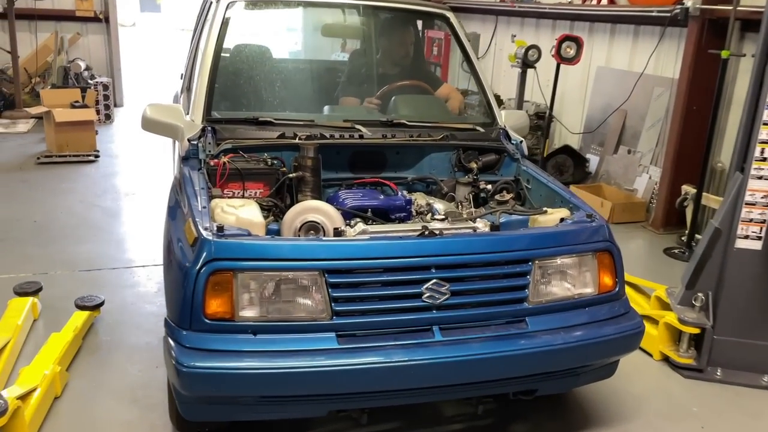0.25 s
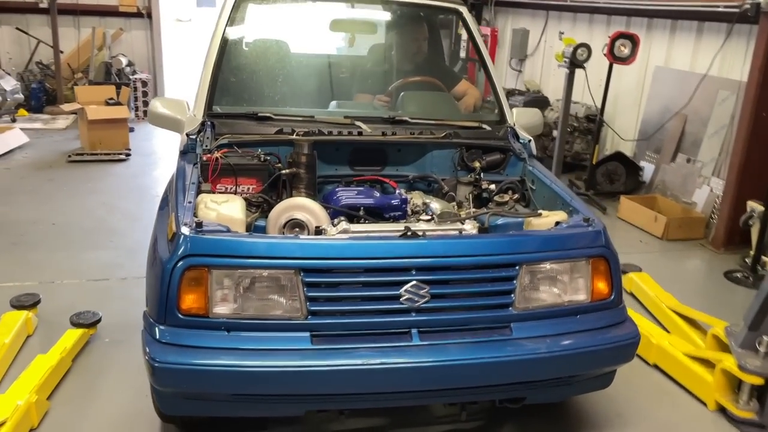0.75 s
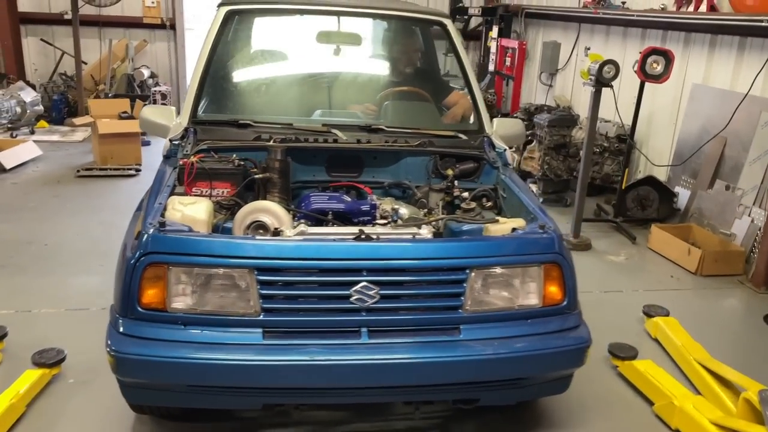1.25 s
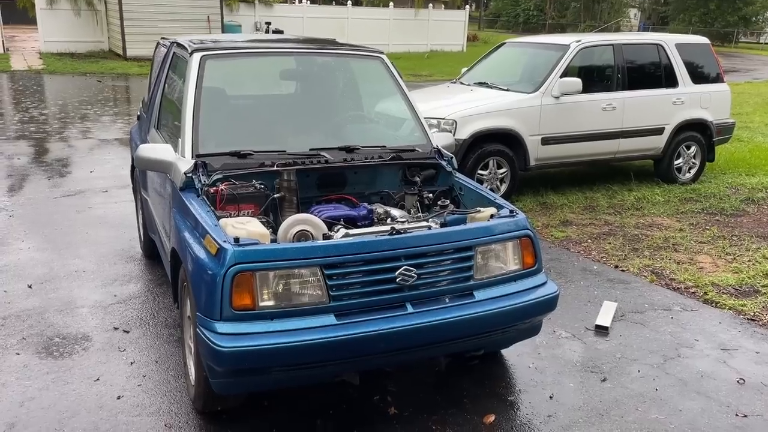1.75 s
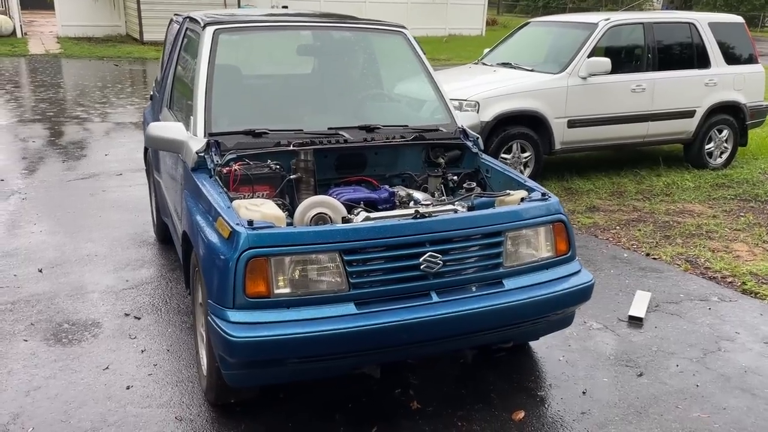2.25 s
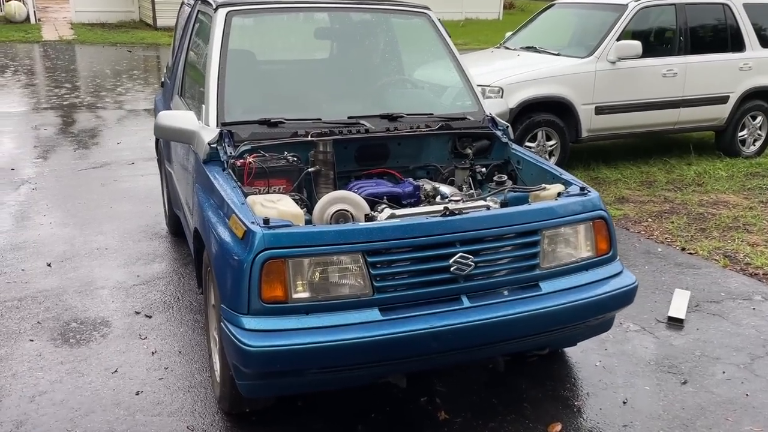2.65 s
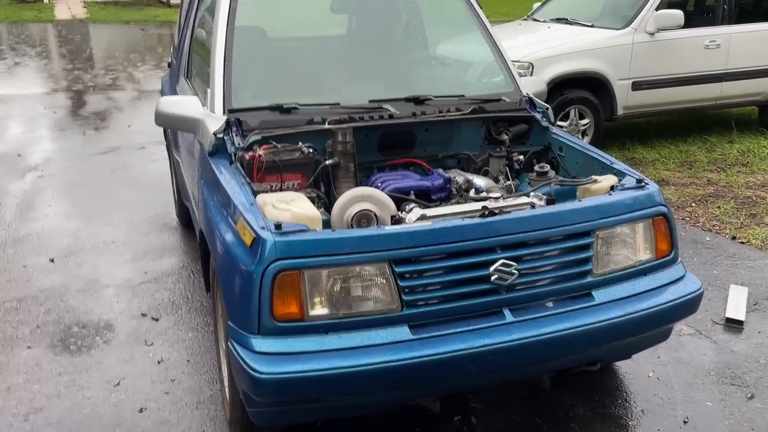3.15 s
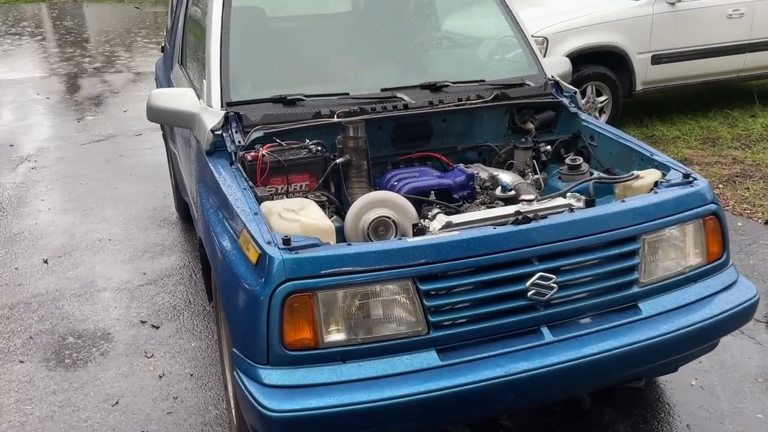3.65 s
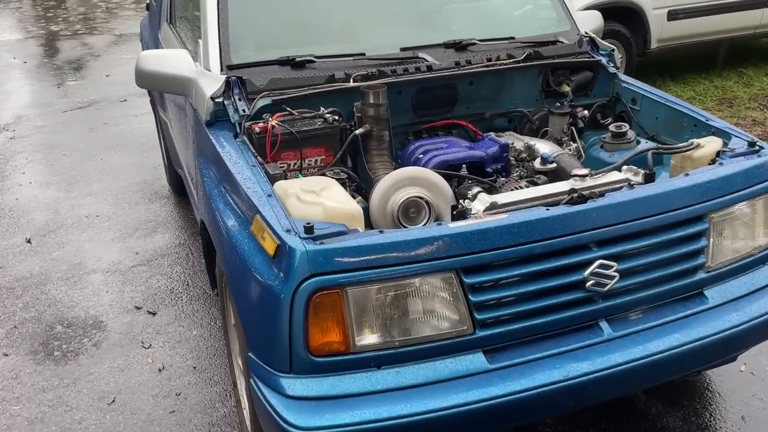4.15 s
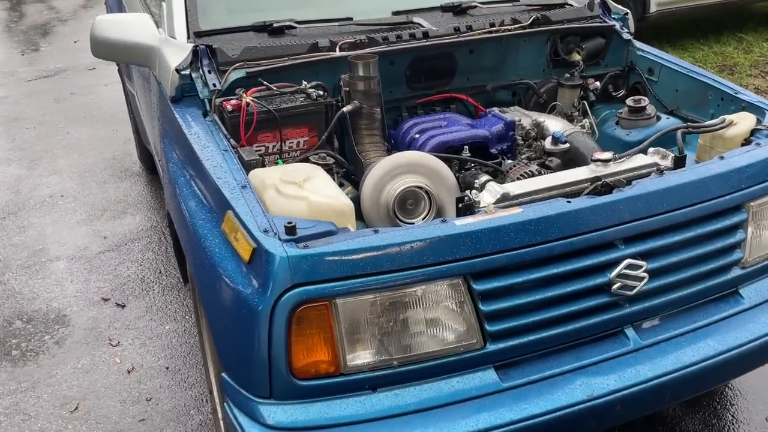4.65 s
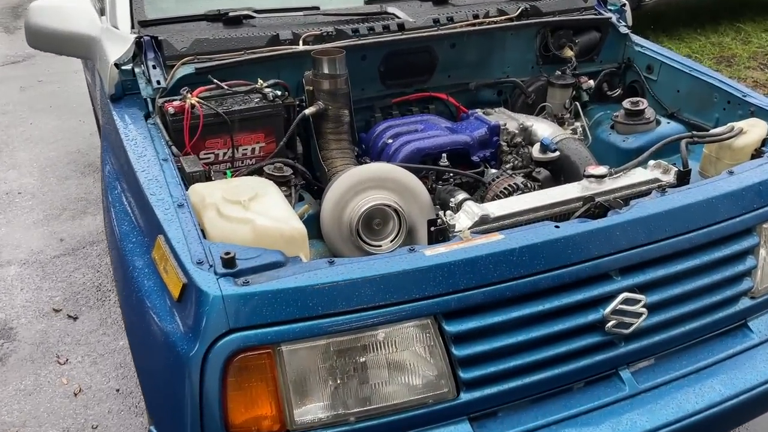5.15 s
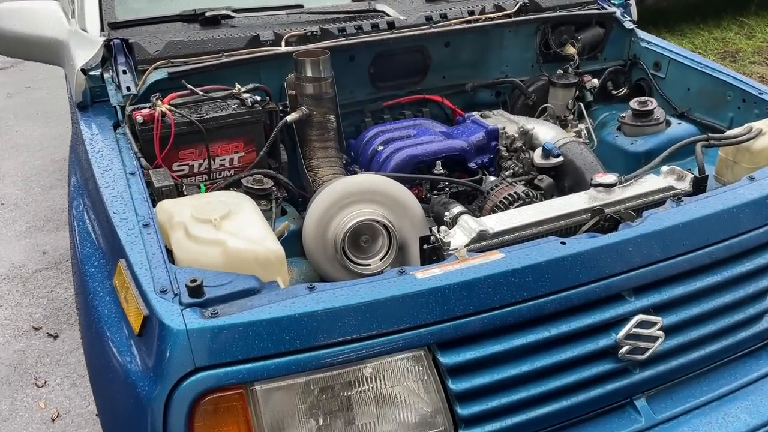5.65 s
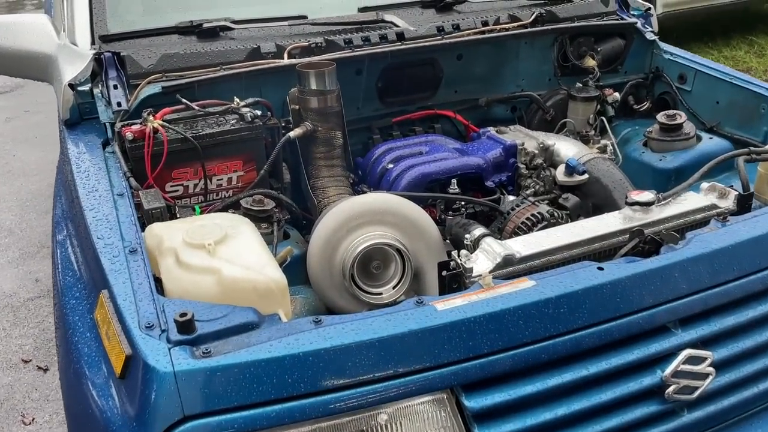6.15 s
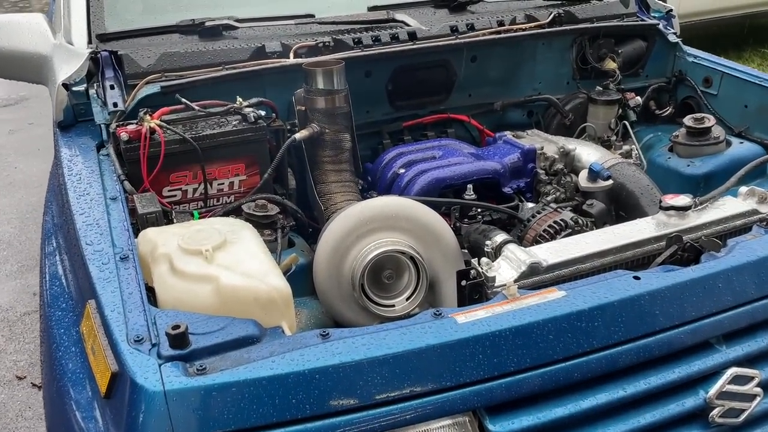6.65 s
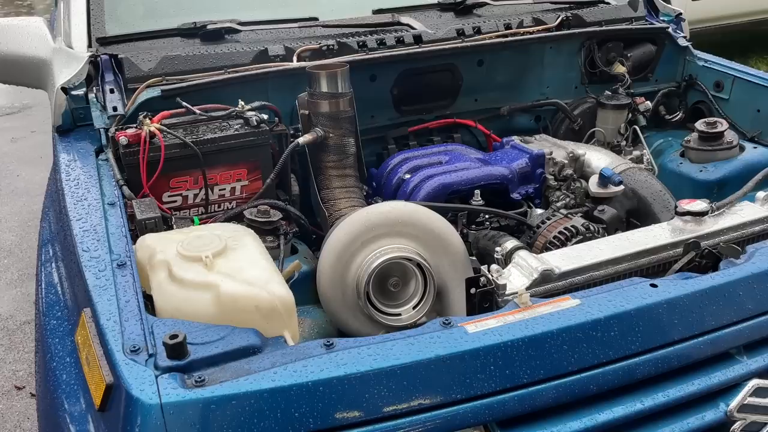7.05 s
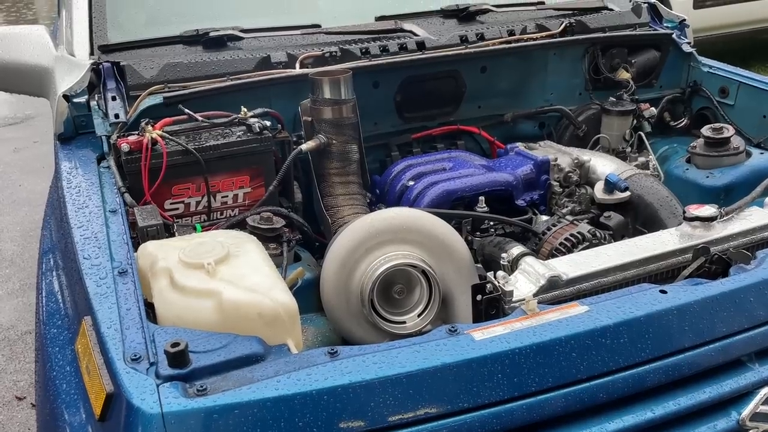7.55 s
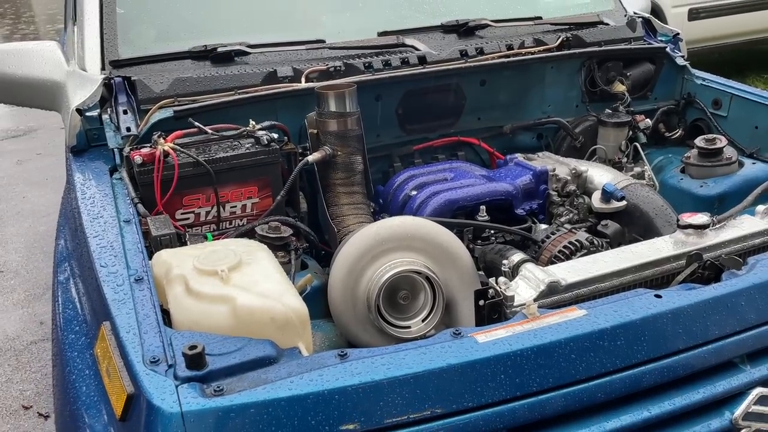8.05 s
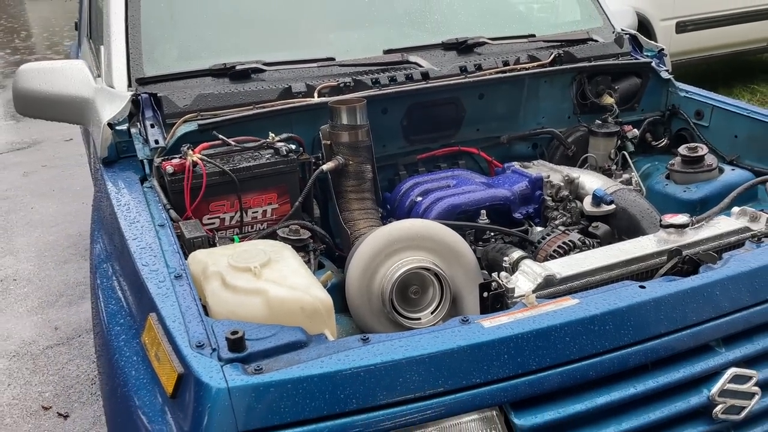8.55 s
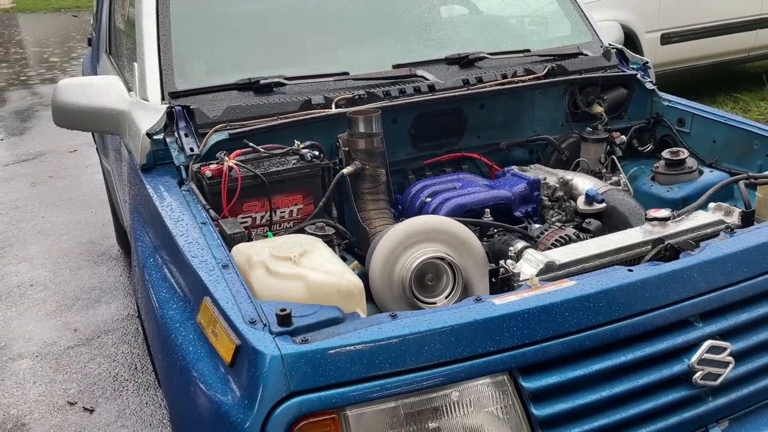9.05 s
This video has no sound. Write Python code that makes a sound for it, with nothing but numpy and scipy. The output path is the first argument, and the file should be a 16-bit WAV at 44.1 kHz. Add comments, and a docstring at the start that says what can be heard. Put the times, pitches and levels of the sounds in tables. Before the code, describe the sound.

A turbocharged engine with an open exhaust drones steadily indoors with short room reverberation, then abruptly sounds drier and lumpier on a wet driveway. It putters and skips, then is blipped three times: loud, tearing, rising bark, sudden fuel cut, descending hum and whir, faint high whistle sinking, and a popping return to idle. Low wind-like thumps hit the nearby microphone at the blips. Bass swells as it moves closer; a last rev climbs into the ending.

```python
"""A workshop, then a wet driveway: a turbocharged two-rotor engine with an open pipe.
Indoors it holds a fast idle. Outdoors it idles lumpily with misfires and is blipped four times, the last
blip still rising at the end. Each burn sends a blow down the pipe, which rings with boom, bark and hiss.
Off the throttle the engine only pumps air, as wavering tones and whir, while a turbo whistle sinks.
Gusts of low noise buffet the two microphone ports late in the first three blips."""
import sys
import numpy as np
from scipy import signal
from scipy.fft import rfft, irfft, next_fast_len
from scipy.io import wavfile
from scipy.ndimage import uniform_filter1d

SR = 44100
rng = np.random.default_rng(int(sys.argv[2]) if len(sys.argv) > 2 else 0)


def waveform_to_disk(signal):
    """Save audio, clipped to [-1, 1], as 16-bit WAV at the path in sys.argv[1]."""
    frames = np.transpose(np.atleast_2d(signal))
    scaled = np.clip(frames, -1, 1) * 32767
    samples = np.round(scaled).astype(np.int16)
    wavfile.write(sys.argv[1], SR, samples)


N = 410122
CUT_S = 1.376   # workshop ends, driveway begins
PADDED = next_fast_len(N + SR // 10)
HZ = np.arange(PADDED // 2 + 1) * SR / PADDED   # frequency of each FFT bin

# A "slot" is one chance to fire; there are two slots in each turn of the shaft.

# Pipe and body resonances; levels are relative within a table: (f/Hz, width/Hz, level/dB)
BOOM_OUTDOORS = [(92, 82, -6.5), (163, 173, -3.5), (270.9, 46.8, 9), (362, 111, -4.5)]
BARK_OUTDOORS = [(423, 30, -0.5), (500, 40, -4.5), (580, 34.4, 0.5), (728, 86, 2.5), (934, 125, -5.5),
                 (960, 28, -2), (1260, 295, -5), (1370, 47, -50), (1660, 53, -5.5), (2646, 116, -13)]
BOOM_WORKSHOP = [(44.4, 8.3, -7), (88, 27, 2), (170, 46, -2.5), (172, 12.6, 3), (231, 39, 9),
                 (263, 14.6, 5)]
BARK_WORKSHOP = [(407, 17, -0.5), (548, 37, 5), (704, 190, -6.5), (950, 31, -5), (1300, 310, -11.5),
                 (1620, 50, -1.5)]
# Colour of the exhaust hiss: (f/Hz, relative level per Hz/dB)
HISS_OUTDOORS = [(500, -15), (1200, -9), (1900, -9), (2300, -13), (2700, -3), (3600, -9.5), (4300, -11.5),
                 (4900, -8), (5800, -11), (7500, -14), (9500, -5.5), (12000, -9), (16500, -17)]
HISS_WORKSHOP = [(300, -7), (500, -11), (650, -3), (1600, -11.5), (2400, -19.5), (3870, -13), (5600, -20.5),
                 (6950, -11), (9000, -13), (12000, -9), (16500, -26)]
# How hard the engine works indoors: (t/s, blow level/dB, throttle 0-1)
LOAD_WORKSHOP = [(0, -16, 0.41), (0.398, -14.5, 0.32), (.9, -15, 0.36), (1.368, -17, 0.42)]
BURST_OUTDOORS_S, BURST_WORKSHOP_S = 0.0046, 0.0035   # decay time of each burst of hiss
HISS_LAG_S = .001         # the hiss trails the blow
BARK_LEAD_S = 0.001224    # the crack at the port arrives before the boom has built up
HOT_BOOM_RISE, HOT_BARK_RISE = 1.08, 1.044   # hot gas raises the pitch by these factors at throttle 1


def exhaust(clicks, cracks, load, boom, bark, rasp, bark_db, rasp_db, burst_s, steady):
    """Blows ring the pipe and tear out bursts of hiss; throttle raises the bark and hiss."""
    blow_db, throttle = in_time(load)
    heard = clicks > 1e-6
    span = slice(np.argmax(heard), N - np.argmax(heard[::-1]))   # first blow to last

    fall = np.exp(-1 / (burst_s * SR))
    uneven_cracks = cracks * amp(1.2 * drift(90))
    bursts = signal.lfilter([1], [1, -fall], np.roll(uneven_cracks, int(HISS_LAG_S * SR)))
    flow = uniform_filter1d(bursts, size=700)   # gas keeps streaming between blows
    hiss = noise(rasp) * (bursts + steady * throttle * flow)

    soft = np.exp(-1 / (0.00077 * SR))
    puffs = signal.lfilter([1], [1, -2 * soft, soft * soft], clicks)   # the port opens gradually
    hot_boom = [(hz * HOT_BOOM_RISE, width, level_db) for hz, width, level_db in boom]
    booms = (1 - throttle) * resonate(puffs, boom) + throttle * resonate(puffs, hot_boom)

    hot_bark = [(hz * HOT_BARK_RISE, width, level_db) for hz, width, level_db in bark]
    cool_barks = (1 - throttle) * bark_ring(cracks, bursts, bark)
    barks = cool_barks + throttle * bark_ring(cracks, bursts, hot_bark)
    barks = np.roll(barks, -int(BARK_LEAD_S * SR))

    booms, barks, hiss = [layer / np.std(layer[..., span]) for layer in (booms, barks, hiss)]
    barks = amp(bark_db + 13.67 * throttle) * barks
    hiss = amp(rasp_db + 5.5 * throttle) * hiss
    return -amp(blow_db) * (booms + barks + hiss)


# Gain on the lower bark as the microphone walks round: (t/s, level/dB)
LOW_BARK_GAIN = [(1.38, 2.5), (2.5, 1.5), (3.3, 3.5), (5.0, 5.5), (7.0, 5.5), (9.3, 4.5)]
TEAR_HZ = 1050                     # divides the lower bark from the upper
TORN_LOW, TORN_HIGH = .015, .06    # share of torn, noisy gas in each


def bark_ring(cracks, bursts, modes):
    """Low modes ring quite cleanly on each crack; torn gas makes the high ones more ragged."""
    low = [mode for mode in modes if mode[0] < TEAR_HZ]
    high = [mode for mode in modes if mode[0] >= TEAR_HZ]
    gas = rng.standard_normal(N) * bursts
    low_ring = amp(in_time(LOW_BARK_GAIN)[0]) * resonate(cracks + TORN_LOW * gas, low)
    return low_ring + resonate(cracks + TORN_HIGH * gas, high)


def firings(slots, runs, second_db, late_s, scatter_db, crack_scatter_db, crack_second_db,
            refire_db=0, odd_turn_db=0, odd_turn_late_s=0):
    """One blow a slot in each run, with a crack at its front; rotors and alternate turns may differ."""
    clicks, cracks = np.full(N, 1e-18), np.full(N, 1e-18)
    chance = rng.standard_normal((2000, 3))   # timing, blow level, crack level
    for first, last in runs:
        start = slots[int(first * SR)]
        steps = np.arange(round(slots[int(last * SR)] - start) + 1)
        slot = int(start) + steps
        second_rotor = steps % 2
        odd_turn = steps % 4 > 1
        at = np.searchsorted(slots, start + steps + .0035 * chance[slot, 0])
        at = at + (SR * (late_s * second_rotor + odd_turn_late_s * odd_turn)).astype(int)
        at = np.minimum(at, N - 1)
        level_db = second_db[at] * second_rotor + scatter_db * chance[slot, 1]
        level_db = level_db + odd_turn_db * odd_turn
        clicks[at] = amp(level_db)
        crack_db = crack_second_db * second_rotor + crack_scatter_db * chance[slot, 2]
        crack_db = crack_db + refire_db * (steps == 0)   # leftover charge changes the first crack
        cracks[at] = amp(level_db + crack_db)
    return np.array([clicks, cracks]) / np.sqrt(np.gradient(slots))   # faster firing shares the same power


# Misfires at idle: (t/s when fire resumes, slots missed before it)
MISSED_FIRES = [(1.519, 1), (1.576, 3), (1.687, 1), (1.715, 1), (1.813, 1), (1.857, 1), (2.024, 1),
                (2.053, 1), (2.221, 1), (2.363, 1), (2.477, 1), (2.620, 1), (3.925, 1), (4.049, 8),
                (4.146, 1), (4.200, 1), (4.484, 1), (5.747, 1), (5.766, 1), (5.817, 4), (5.837, 1),
                (5.889, 1), (5.923, 2), (5.943, 1), (5.965, 1), (6.039, 1), (6.366, 1), (6.741, 1),
                (6.868, 1), (6.920, 1), (6.958, 1), (7.022, 1), (7.049, 1), (7.206, 1), (7.261, 1),
                (7.365, 1), (8.540, 4), (8.561, 1), (8.609, 1), (8.632, 1), (8.664, 2), (8.685, 1),
                (8.741, 1), (8.794, 1), (8.827, 1), (8.871, 1), (8.927, 1), (9.009, 1)]
# Throttle blips: (t/s opens, time to open/s, t/s shuts, t/s fuel returns,
#  slots per s at opening, at shutting, when idle catches, idle blow level/dB before, open blow level/dB,
#  whistle f/Hz at shutting, whistle level/dB before its colour and other gains,
#  time until air drag halves the wheel's extra speed/s, time for the whistle to fade in/s)
THROTTLE_BLIPS = [(2.62, .12, 3.298, 3.906, 70.2, 202, 93, -18, -12.5, 4165, -3, 1.16, .3),
                  (4.475, .04, 5.072, 5.72, 87, 215, 98, -14, -11, 5040, 2, 1.085, .08),
                  (7.355, .05, 7.918, 8.491, 75.5, 194, 97, -17, -12, 4100, 0, 1.36, .02),
                  (9.12, .1, 9.7, 10.3, 86, 195, 97, -17.5, -10, 4200, 0, 1.2, .3)]


def firing_runs(slots):
    """Unbroken runs (first s, last s): each ends at a misfire or when the throttle shuts and fuel is cut."""
    t = np.arange(N) / SR
    gaps = []
    for resumes, missed in MISSED_FIRES:
        last_slot = np.interp(resumes, t, slots) - missed - 1
        gaps.append((np.interp(last_slot, slots, t), resumes))
    gaps += [(min(blip[2], t[-400]), blip[3]) for blip in THROTTLE_BLIPS]
    gaps = sorted(gaps, key=lambda gap: gap[1])
    firsts = [CUT_S + .003] + [resumes for _, resumes in gaps]
    return [(first, max(first, last)) for first, (last, _) in zip(firsts, gaps)]


FIRST_IDLE_SLOTS_PER_S = 72.07
RISE_S, COAST_S, SETTLE_S = 1.5, .66, .9   # time constants of climbing, coasting and settling
CATCH_S = .09                              # idle catches this long after the fuel returns


def shaft_speed():
    """Slots per second outdoors: climbs under throttle, coasts down without fuel, settles at idle."""
    knots = [(CUT_S, FIRST_IDLE_SLOTS_PER_S, SETTLE_S)]
    for opens, _, shuts, returns, low, high, caught, *_ in THROTTLE_BLIPS:
        knots += [(opens, low, RISE_S), (shuts, high, COAST_S), (returns + CATCH_S, caught, SETTLE_S)]
    t, out = np.arange(N) / SR, np.full(N, knots[0][1])
    for (start, was, ease), (end, becomes, _) in zip(knots, knots[1:]):
        on = (t >= start) & (t < end)
        progress = np.expm1((start - t[on]) / ease) / np.expm1((start - end) / ease)
        out[on] = was + (becomes - was) * progress
    return uniform_filter1d(out, size=1300)


IDLE_THROTTLE, OPEN_THROTTLE, SHUTTING_THROTTLE = 0.0073, 0.68, 0.5
EASE_S, EASE_DB = 0.016, 0.5         # just before shutting: throttle eases, blow level shifts
RELIGHT_S, RELIGHT_DB = 0.017, -6.5  # weak first blows at each start of idle


def load():
    """Rows of (s, blow dB, throttle) outdoors: weak relighting, idle, opening, hold and easing."""
    rows, begins = [], CUT_S
    for opens, takes, shuts, returns, _, _, _, idle_db, open_db, *_ in THROTTLE_BLIPS:
        rows += [(begins, idle_db + RELIGHT_DB, IDLE_THROTTLE),
                 (begins + RELIGHT_S, idle_db, IDLE_THROTTLE),
                 (opens, idle_db, IDLE_THROTTLE),
                 (opens + takes, open_db, OPEN_THROTTLE),
                 (shuts - EASE_S, open_db, OPEN_THROTTLE),
                 (shuts, open_db + EASE_DB, SHUTTING_THROTTLE)]
        begins = returns
    return rows


# Air pumped without fire: (multiple of shaft turns, relative level/dB)
PUMPED_AIR = [(.5, -13), (1, 13.5), (2, 17), (3, 6.5), (4, 6), (5, -8), (6, 0.5), (7, 0), (8, -1.5),
              (9, -19.5), (10, -10.5), (11, -19), (12, -11), (13, -9), (14, -9), (15, -8.5), (16, -6),
              (18, -9.5), (20, -9), (22, -30)]
# The pipe full of cooler air rings lower while coasting: (f/Hz, width/Hz, relative level/dB)
COOL_PIPE_MODES = [(90, 54, -11), (157, 156, -4), (242, 37, 9.5), (322, 43, -2.5), (572, 140, 1.5),
                   (846, 180, -11), (1277, 84, -1), (1720, 130, -6)]
# Colour of belts, intake and turbo: (f/Hz, relative level per Hz/dB)
WHIR_COLOUR = [(25, -19), (60, -28), (200, -6), (550, -14), (730, -19), (880, -14), (1080, -17),
               (1300, -15), (1500, -19), (1900, -21.5), (3450, -15.5), (5600, -24), (6640, -22),
               (9000, -35), (11000, -20), (16500, -39.5)]
# Microphone walking to the engine bay: (t/s, pumping and whir level/dB, wet-ground bounce strength 0-1)
CLOSENESS = [(1.38, -5, 0.55), (2.6, -0.5, 0.51), (3.3, -0.5, 0.2), (4.5, 3, 0), (5.5, 1.5, 0),
             (7.3, 1.5, 0), (9.3, 0.5, 0)]
# levels at 100 slots per s, before closeness, and their change per doubling of speed
PUMP_DB, PUMP_DB_PER_OCTAVE, WHIR_DB, WHIR_DB_PER_OCTAVE = -22.5, -8, -38, 4.5


def coasting(speed, slots, runs):
    """Pumped air as wavering sines through the pipe, and the noisy whir of belts, intake and turbo."""
    near_db, octaves = in_time(CLOSENESS)[0], np.log2(speed / 100)
    orders = 0
    for k, db in PUMPED_AIR:
        orders = orders + amp(db + .8 * drift(15)) * np.sin(np.pi * k * slots + k * k)
    piped = rms_one(resonate(orders, COOL_PIPE_MODES))
    pump = amp(PUMP_DB + PUMP_DB_PER_OCTAVE * octaves) * unlit(runs) * piped
    throb = 1 + 0.031 * np.sin(2 * np.pi * slots)
    whir_db = WHIR_DB + WHIR_DB_PER_OCTAVE * octaves + 2.0 * drift(30)
    whir = amp(whir_db) * throb * noise(WHIR_COLOUR)
    return amp(near_db) * (pump + whir)


def unlit(runs):
    """1 while the chambers pass without fire, low while they burn."""
    gate = np.ones(N)
    for first, last in runs:
        gate[int(first * SR):int((last + .014) * SR)] = 0.12
    return uniform_filter1d(gate, size=400)


# The intake favours one pitch of the whistle: (f/Hz, level/dB)
INTAKE_COLOUR = [(2450, -52), (2900, -45), (3400, -39), (3700, -44), (4100, -51), (4700, -49)]
TURBO_IDLE_HZ = 1200   # pitch the whistle sinks towards


def whistle():
    """A slightly unsteady tone sinks as the wheel slows, from throttle shutting to the next opening."""
    out, t = np.zeros(N), np.arange(N) / SR
    for blip, following in zip(THROTTLE_BLIPS, THROTTLE_BLIPS[1:]):
        shuts, (top_hz, level_db, slows, emerges) = blip[2], blip[-4:]
        hz = TURBO_IDLE_HZ + (top_hz - TURBO_IDLE_HZ) / (1 + np.maximum(t - shuts, 0) / slows)
        fade = np.clip(np.minimum((t - shuts) / emerges, (following[0] - t) / 0.022), 0, 1)
        level_db = level_db + np.interp(hz, *np.transpose(INTAKE_COLOUR))
        level = fade * amp(level_db + 3 + 2.2 * drift(25))
        out += level * np.sin(2 * np.pi * np.cumsum(hz + 6 * drift(60)) / SR)
    return out


# Loose sheet metal: (f/Hz, width/Hz, relative level/dB)
SHEET_METAL = [(2540, 210, -1), (4550, 550, 0), (5130, 270, 10)]
# Level of its pings, added to the blow level: (t/s, level/dB)
SHEET_METAL_LEVEL = [(1.38, -46), (2.1, -27), (3.3, -27), (4.0, -29.5), (5.0, -30.5), (5.75, -23),
                     (6.5, -36), (7.4, -31), (9.3, -36)]
RATTLE_SCATTER_DB = 7.5


def rattle(cracks, load):
    """Loose metal pings just after the cracks, very uneven in strength."""
    knocks = np.roll(cracks * amp(RATTLE_SCATTER_DB * drift(70)), int(HISS_LAG_S * SR))
    level_db = in_time(load)[0] + in_time(SHEET_METAL_LEVEL)[0]
    return amp(level_db) * rms_one(resonate(knocks, SHEET_METAL))


# Exhaust gusts on the microphone: (middle t/s, length/s, level/dB)
EXHAUST_GUSTS = [(3.14, 0.055, -10.5), (3.262, 0.057, -28), (4.934, 0.067, -22.5), (5.051, 0.11, -17),
                 (7.556, 0.053, -17), (7.676, 0.025, -13), (7.8, .05, -26), (7.89, 0.15, -19)]


def gusts():
    """Moving air buffets the microphone: lumpy low noise in short swells."""
    t = np.arange(N) / SR
    swell = sum(amp(db) * np.exp(-8 * ((t - s) / length) ** 2) for s, length, db in EXHAUST_GUSTS)
    colour = [(20, -30), (40, -3), (70, 3), (150, -5), (300, -17), (600, -32), (1200, -70)]   # f/Hz, level/dB
    return swell * noise(colour)


# A bright echo off a panel near the pipe, varying as the microphone walks: (t/s, lag/ms, strength 0-1)
PANEL_ECHO = [(1.38, 1.43, 0.28), (2.6, 1.41, 0.38), (3.3, 1.7, 0.24), (4.4, 1.9, 0), (5.2, 1.37, 0.08),
              (6.0, 1.67, 0.12), (7.3, 1.38, 0.07), (8.0, 2.06, 0.26), (9.3, 1.44, 0.04)]


def panel(x):
    """A close panel reflects the sound, with a lag that changes slowly."""
    lag_ms, strength = in_time(PANEL_ECHO)
    at = np.arange(N) - lag_ms * SR / 1000
    echo = np.array([np.interp(at, np.arange(N), side) for side in x])
    return x + np.clip(strength, 0, 1) * echo


GROUND_LAG_S, GROUND_CUT_HZ = 0.002503, 750


def ground(x):
    """Wet ground returns a late, dull copy, strongest from afar."""
    lag = int(GROUND_LAG_S * SR)
    dull = signal.lfilter(*signal.butter(1, GROUND_CUT_HZ, fs=SR), x)
    late = np.pad(dull, [(0, 0), (lag, 0)])[:, :N]
    return x + np.clip(in_time(CLOSENESS)[1], 0, 1) * late


# Extra bass, greatest close to the engine bay: (t/s, level/dB)
EXTRA_BASS = [(1.38, -18), (3.0, -30), (5.5, -21), (6.3, -5.5), (7.3, 1.5), (8.2, -2), (9.3, -34)]
EXTRA_BASS_HZ = 100   # added mostly below this


def deepen(x):
    """Close to the car the lowest bass swells: a low-passed copy is added."""
    bass = signal.lfilter(*signal.butter(1, EXTRA_BASS_HZ, fs=SR), x)
    return x + amp(in_time(EXTRA_BASS)[0]) * bass


def workshop(x, t60):
    """Room reverberation: a decaying noise tail, partly its own for each side."""
    t = np.arange(SR) / SR
    colour = [(60, -65), (250, -1.5), (450, -13.5), (1500, -7.5), (8000, -17.5)]   # f/Hz, level/dB
    tail = noise(colour)[:, :SR] * amp(-60 * t / t60) * (t > .012)
    tail = tail / np.sqrt(np.sum(tail ** 2) / 2)
    return signal.fftconvolve(x[:, :2 * SR], tail, axes=1)


# Echoes off bodywork and ground: (left lag/ms, right lag/ms)
SHORT_ECHOES = [(1.4, 1.61), (4.15, 8.2), (8.3, 5.4), (13.1, 14)]
# The two microphone ports: (f/Hz, left lead/rad, left minus right level/dB, noise scatter between sides)
MICROPHONE_PORTS = [(20, 0, -1.1, .1), (300, .25, -1.3, .15), (950, .9, 2.8, .4), (1980, .2, .4, .35),
                    (3200, 1.5, 1.8, .55), (5300, 1.2, 1.6, .55), (6460, -.3, 0, .45), (7580, -3, 0, .3),
                    (9650, -3.2, 0, .2), (12500, -6.1, 0, .22), (16500, -6.4, 0, .15)]
ECHO_DB = -10


def ports(x, echo_db, echo_low_hz, echo_high_hz):
    """Two ports hear different phase and balance, plus short mid-band echoes that differ by side."""
    turn, side = -2j * np.pi * HZ, np.array([[.5], [-.5]])
    mid_band = signal.butter(2, [echo_low_hz, echo_high_hz], "band", fs=SR, output="sos")
    band = signal.sosfilt(mid_band, x)
    echo = np.array([sum((-.8) ** k * np.exp(turn * ms / 1000) for k, ms in enumerate(ear))
                     for ear in np.transpose(SHORT_ECHOES)])
    phase = np.exp(1j * side * at_hz(MICROPHONE_PORTS))
    balance = amp(side * at_hz(MICROPHONE_PORTS, column=2))
    heard = rfft(x, PADDED) + amp(echo_db) * rfft(band, PADDED) * echo
    return irfft(phase * balance * heard, PADDED)[:, :N]


def amp(db):
    """dB to gain."""
    return 10 ** (np.asarray(db) / 20)


def rms_one(x):
    """Scale to rms 1."""
    return x / np.sqrt(np.mean(x ** 2) + 1e-20)


def in_time(rows):
    """Columns of a curve table, one value a sample."""
    s, *columns = np.transpose(rows)
    return [np.interp(np.arange(N) / SR, s, column) for column in columns]


def at_hz(points, column=1):
    """A column of a spectrum table, one value an FFT bin."""
    points = np.array(points)
    return np.interp(np.log(HZ + 1), np.log(points[:, 0]), points[:, column])


def noise(spectrum):
    """Stereo noise of a given colour, partly scattered so that the sides differ; rms 1 overall."""
    shared, apart = rfft(rng.standard_normal((2, PADDED)))
    sides = shared + at_hz(MICROPHONE_PORTS, column=3) * apart * np.array([[1], [-1]])
    return rms_one(irfft(sides * amp(at_hz(spectrum)), PADDED)[:, :N])


def drift(rate):
    """Slow random wander: normal draws of spread 1, rate times a second, joined by lines."""
    knots = np.arange(0, N + SR, SR / rate)
    return np.interp(np.arange(N), knots, rng.standard_normal(len(knots)))


def resonate(x, modes):
    """Resonances in parallel, signs alternating; a narrower one rings longer."""
    out = 0
    for k, (hz, width, level_db) in enumerate(modes):
        r = np.exp(-np.pi * width / SR)
        b = (1 - r * r) / 2 * np.array([1, 0, -1])
        a = [1, -2 * r * np.cos(2 * np.pi * hz / SR), r * r]
        out = out + (-1) ** k * amp(level_db) * signal.lfilter(b, a, x)
    return out


# Shaft speed in the workshop: (t/s, slots per s)
SPEED_WORKSHOP = [(0, 96.6), (.5, 95.9), (.9, 96.4), (1.37, 97.8)]
# Second rotor's blows against the first's, outdoors: (t/s, level/dB)
SECOND_ROTOR = [(1.38, -1.5), (2.6, 3), (3.3, 0.5), (4.4, -0.5), (5.0, -2), (6.0, 1.5), (6.8, -2),
                (7.35, -3.5), (7.5, -1.5), (9.3, -1)]


def scene():
    """Workshop up to the cut, driveway after it."""
    speed = shaft_speed()
    slots = np.cumsum(speed) / SR
    runs = firing_runs(slots)
    clicks, cracks = firings(slots, runs, second_db=in_time(SECOND_ROTOR)[0], late_s=.0002, scatter_db=1.3,
                             crack_scatter_db=.8, crack_second_db=-2.0, refire_db=3.5)
    pings = rattle(cracks, load())
    blows = exhaust(clicks, cracks, load(), BOOM_OUTDOORS, BARK_OUTDOORS, HISS_OUTDOORS,
                    bark_db=-15.5, rasp_db=-22.0, burst_s=BURST_OUTDOORS_S, steady=0.71)
    car = pings - blows + coasting(speed, slots, runs)
    out = ports(deepen(panel(ground(car))) + whistle(), ECHO_DB, 490, 2270) + gusts()

    slots_in = np.cumsum(in_time(SPEED_WORKSHOP)[0]) / SR
    clicks, cracks = firings(slots_in, [(.007, CUT_S)], second_db=np.full(N, -13.0), late_s=0,
                             scatter_db=0.84, crack_scatter_db=0.86, crack_second_db=2.5,
                             odd_turn_db=-1.5, odd_turn_late_s=0.00047)
    near = exhaust(clicks, cracks, LOAD_WORKSHOP, BOOM_WORKSHOP, BARK_WORKSHOP, HISS_WORKSHOP,
                   bark_db=-18.5, rasp_db=-11.5, burst_s=BURST_WORKSHOP_S, steady=14.0)
    cut = int(CUT_S * SR)
    direct = ports(near, ECHO_DB, 480, 4600)[:, :cut]
    out[:, :cut] = direct + amp(-11.0) * workshop(near, 0.26)[:, :cut]
    return out


CUTOFF_HZ = 16550


def record(dry):
    """Peaks are rounded, the deepest bass and the top are cut."""
    dry = signal.sosfilt(signal.butter(2, 40, "high", fs=SR, output="sos"), dry)
    top = 1.05
    rounded = top * np.tanh(dry / top)
    return signal.sosfilt(signal.cheby2(18, 60, CUTOFF_HZ, fs=SR, output="sos"), rounded)


dry = scene()
out = record(dry)
waveform_to_disk(out)
```